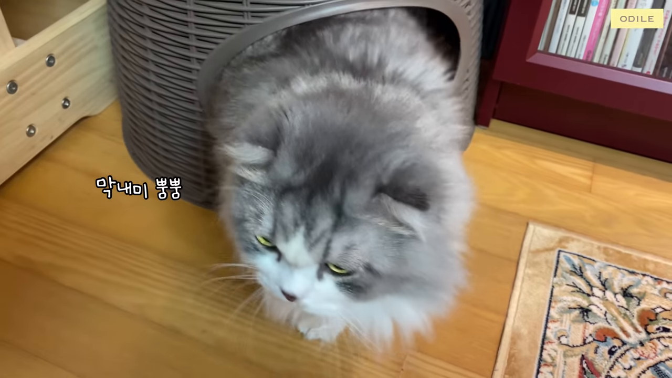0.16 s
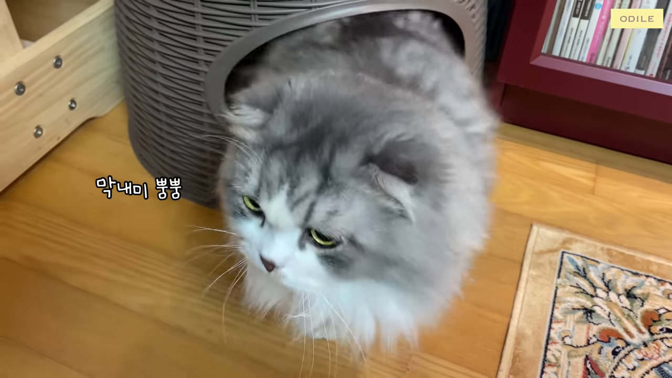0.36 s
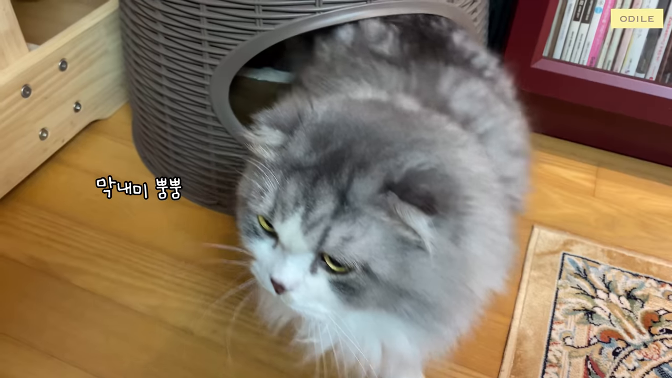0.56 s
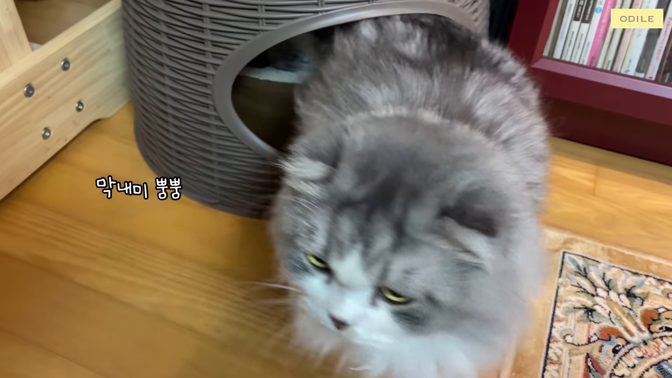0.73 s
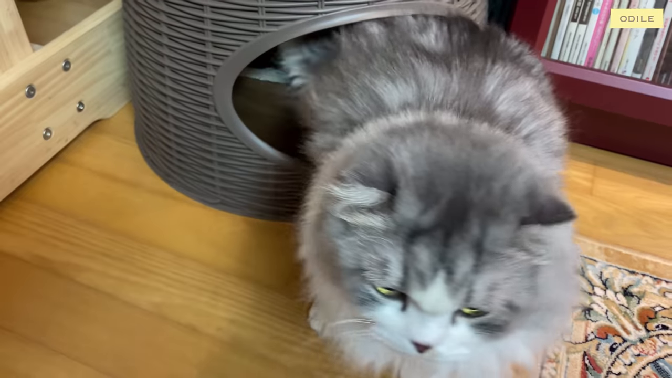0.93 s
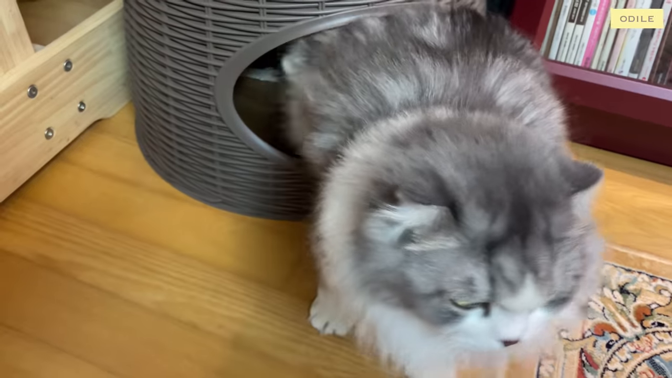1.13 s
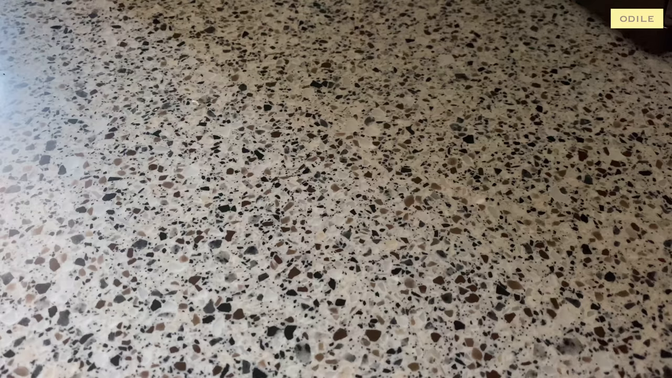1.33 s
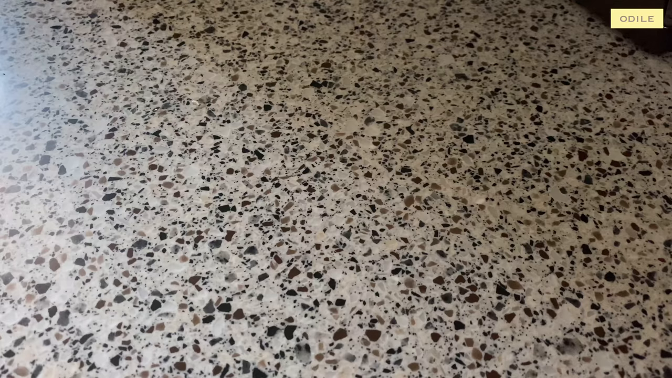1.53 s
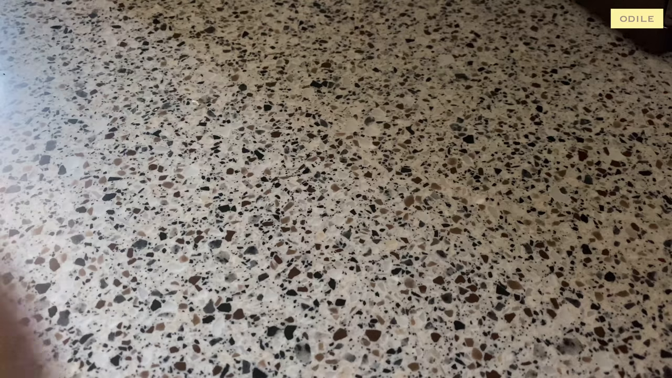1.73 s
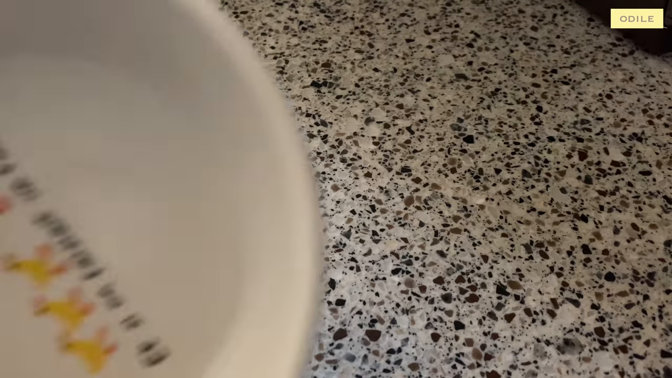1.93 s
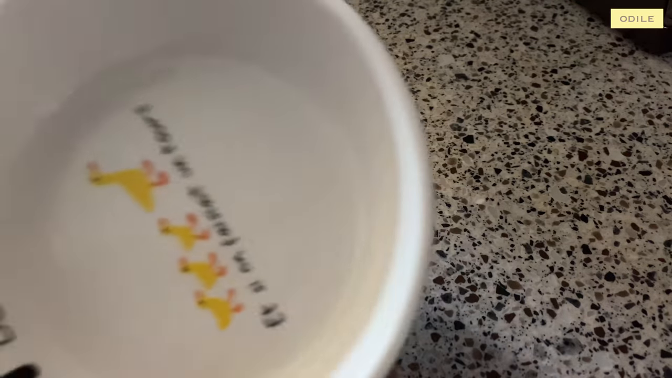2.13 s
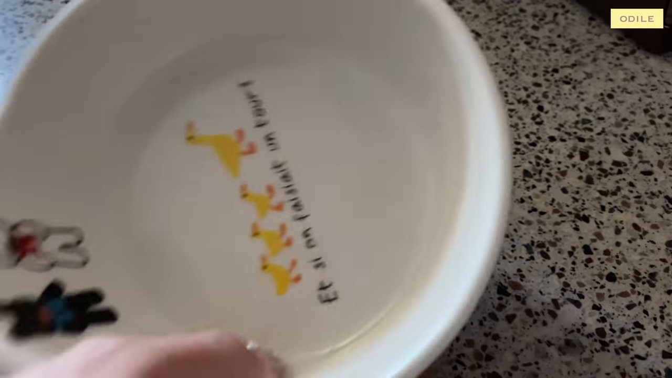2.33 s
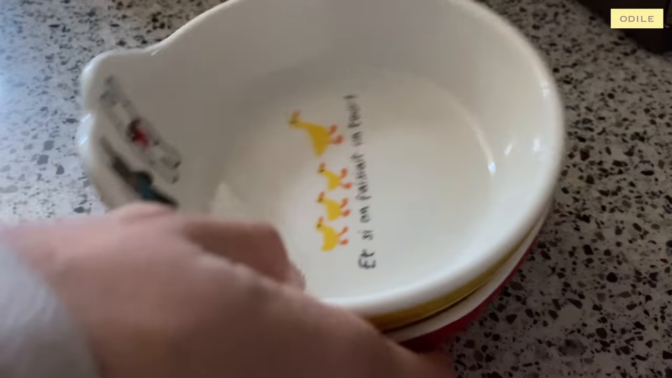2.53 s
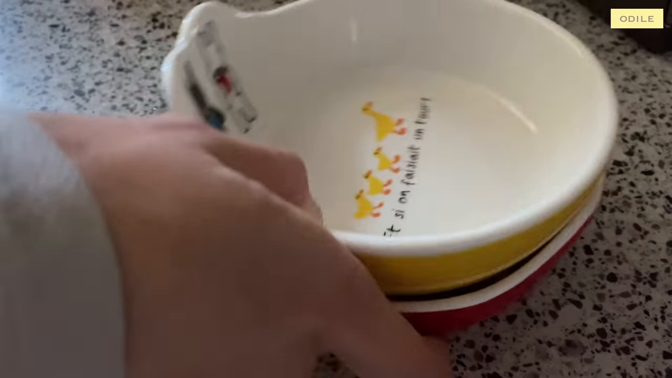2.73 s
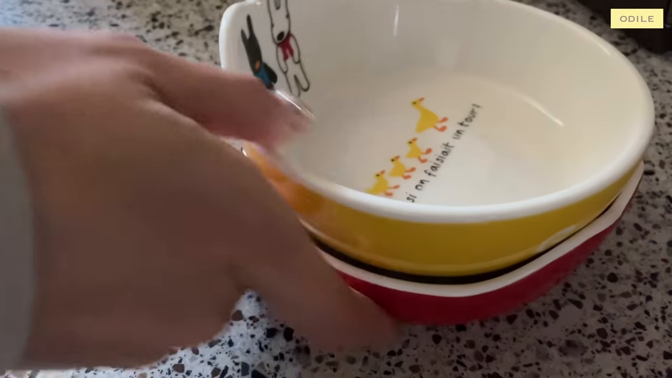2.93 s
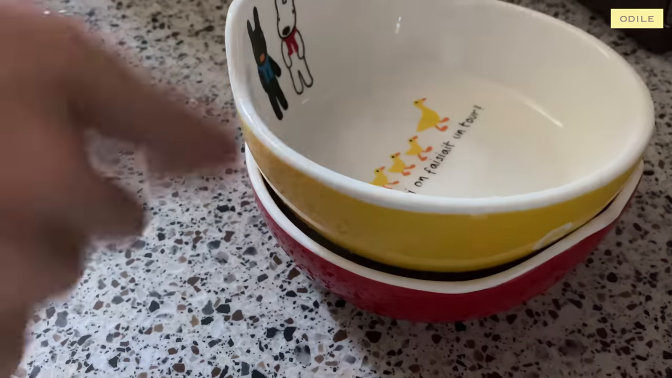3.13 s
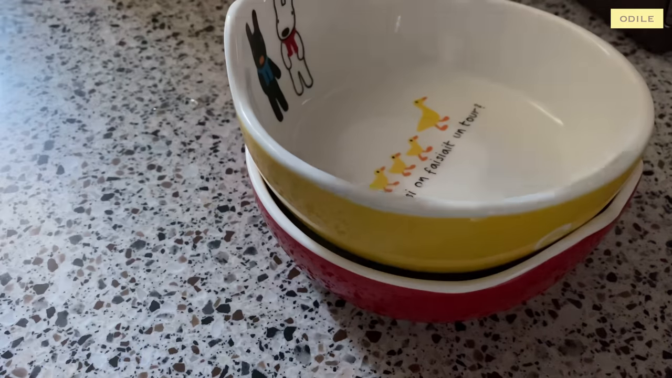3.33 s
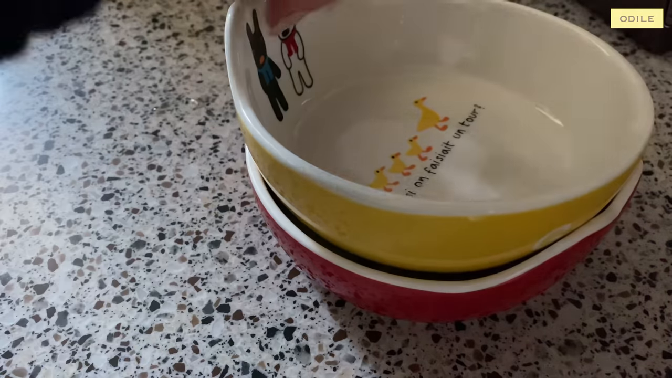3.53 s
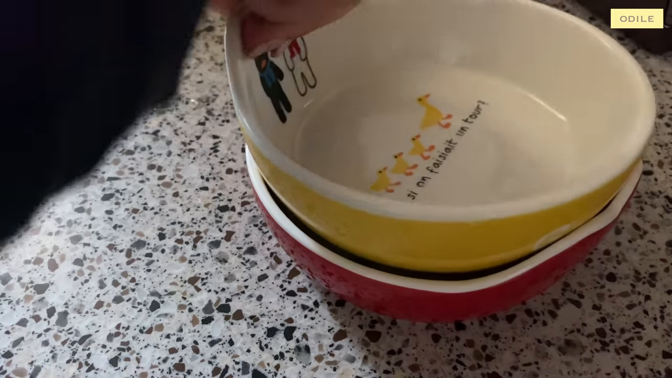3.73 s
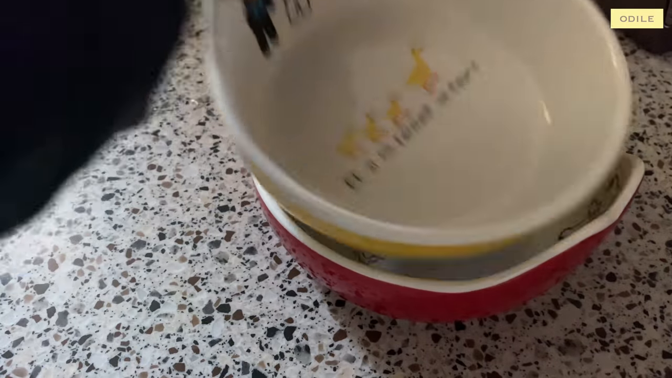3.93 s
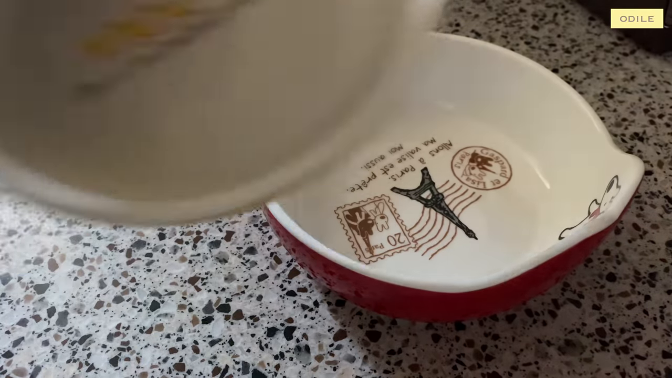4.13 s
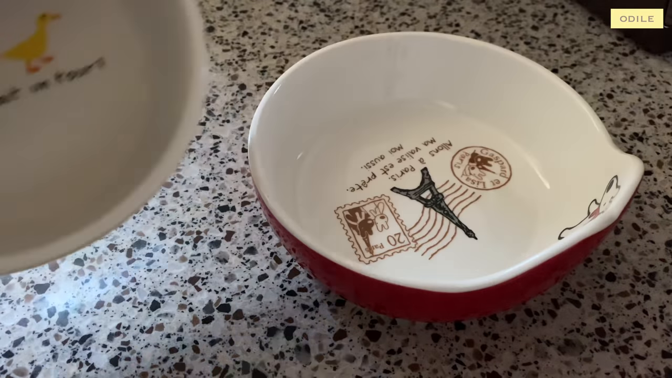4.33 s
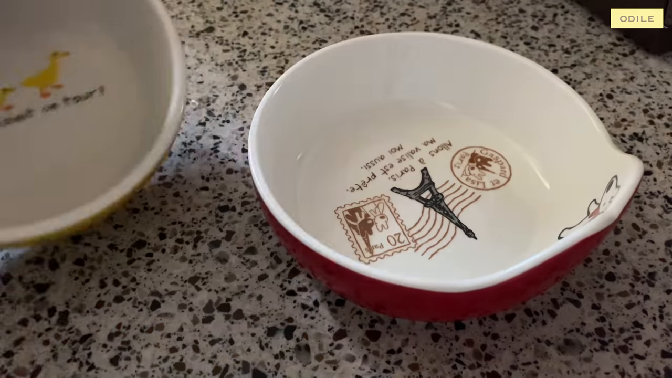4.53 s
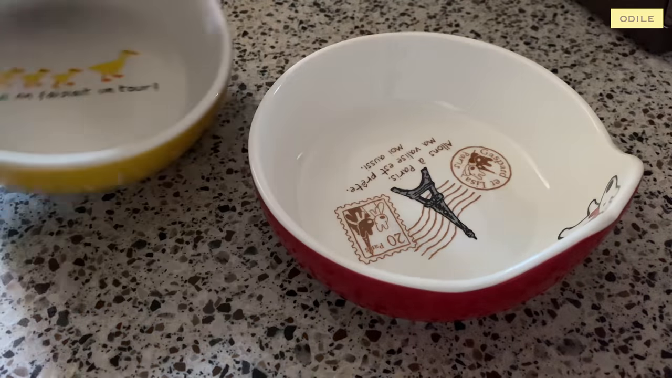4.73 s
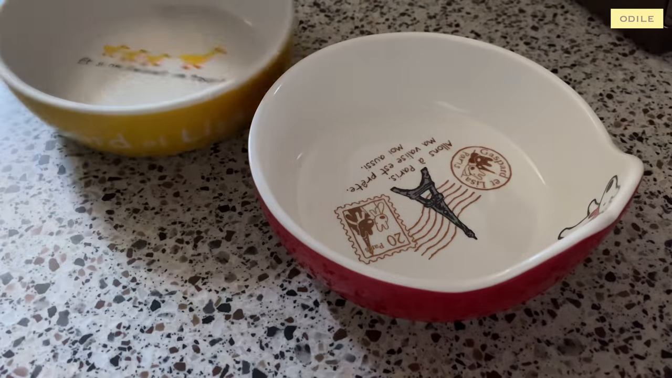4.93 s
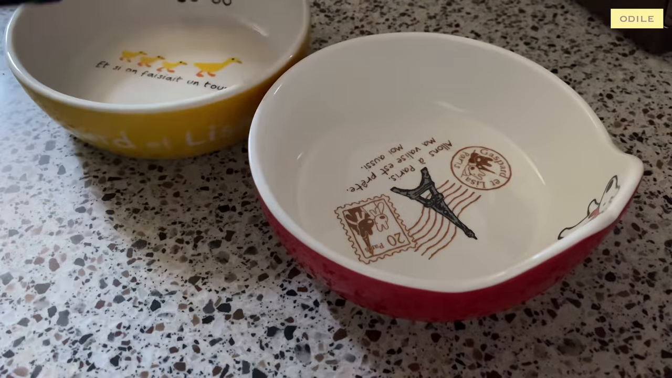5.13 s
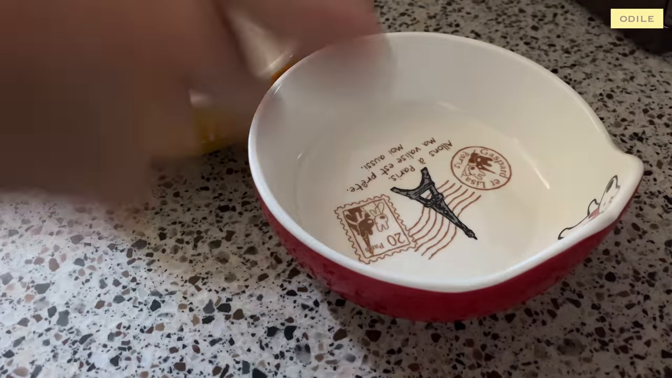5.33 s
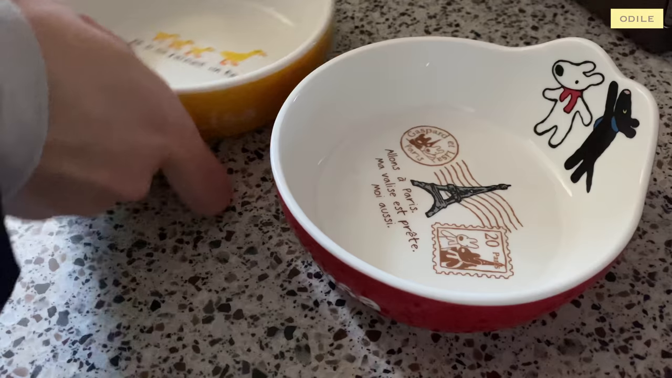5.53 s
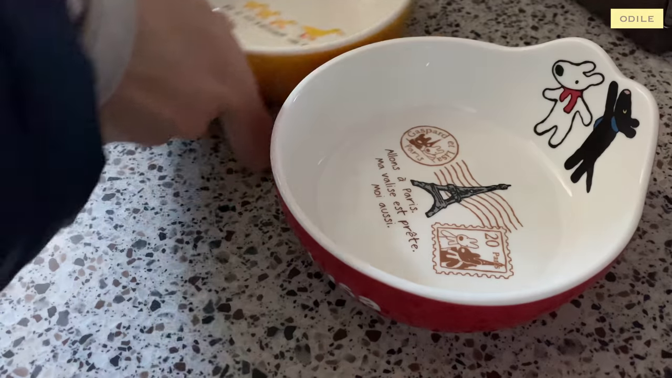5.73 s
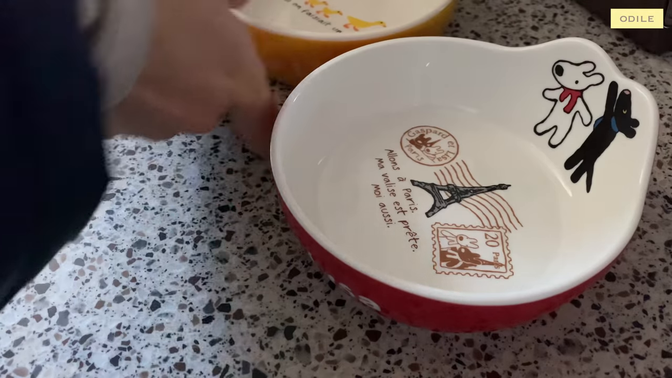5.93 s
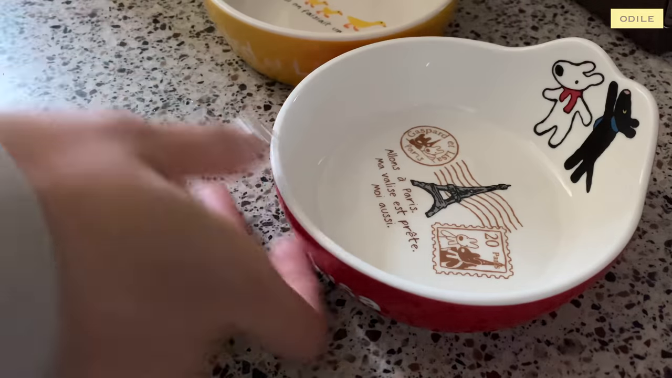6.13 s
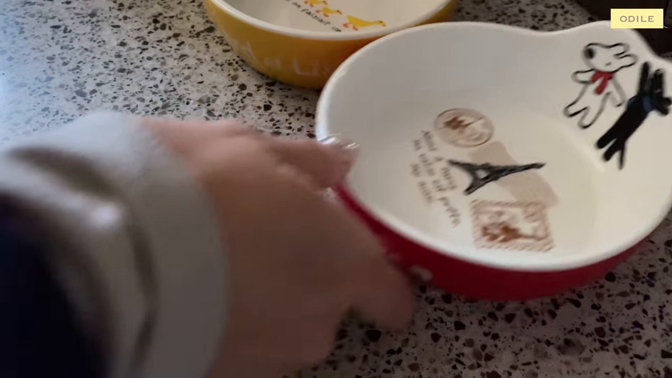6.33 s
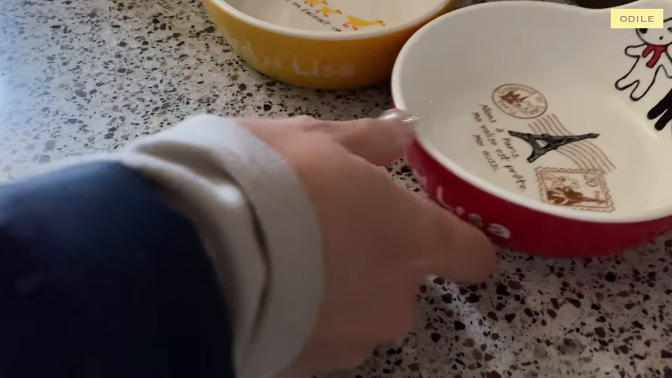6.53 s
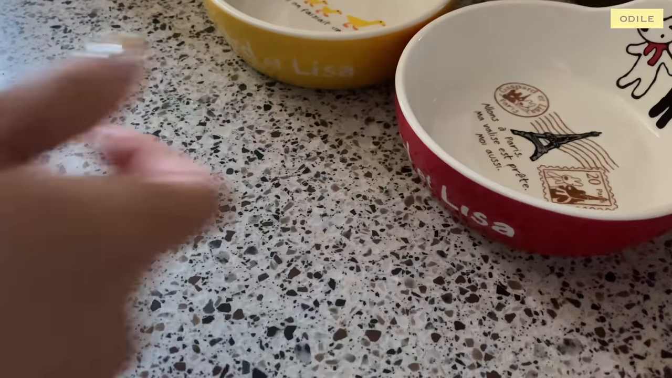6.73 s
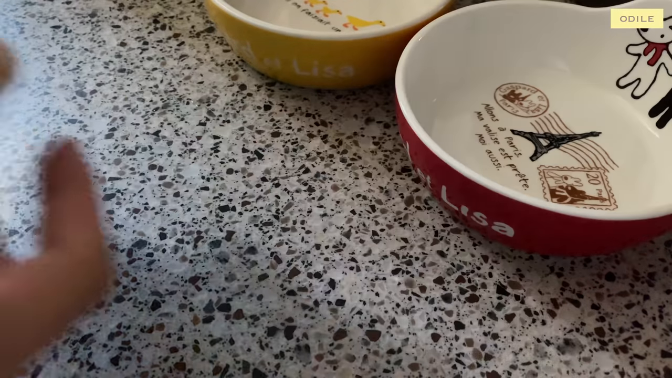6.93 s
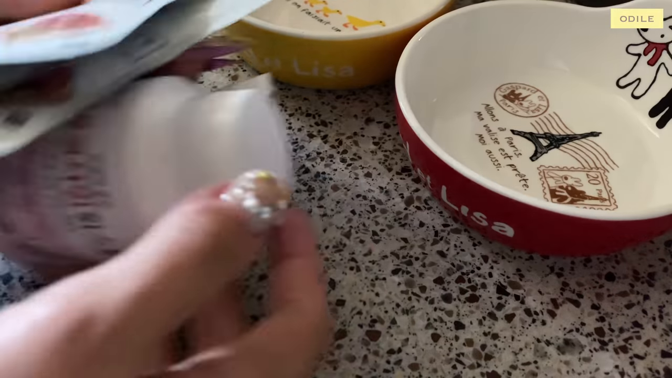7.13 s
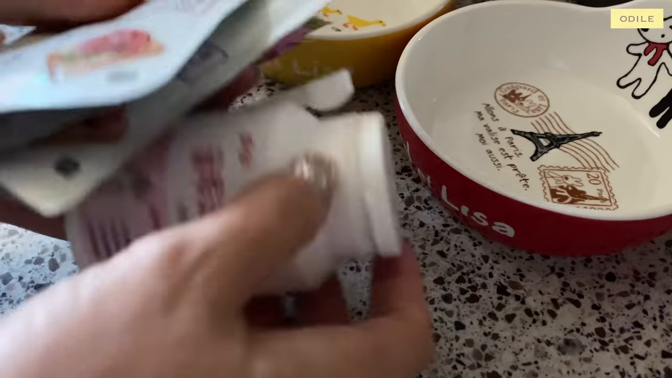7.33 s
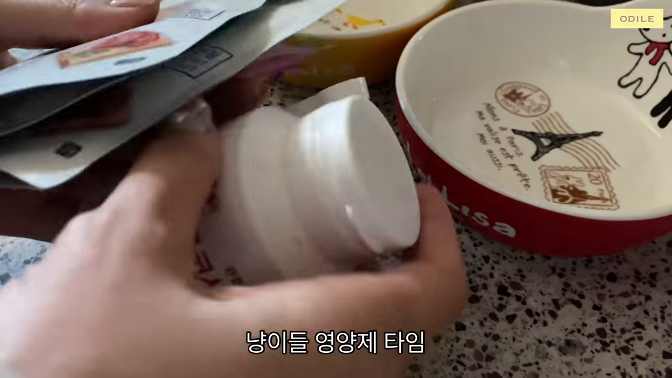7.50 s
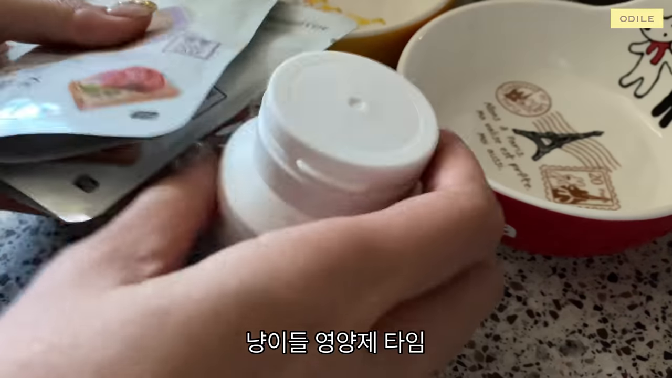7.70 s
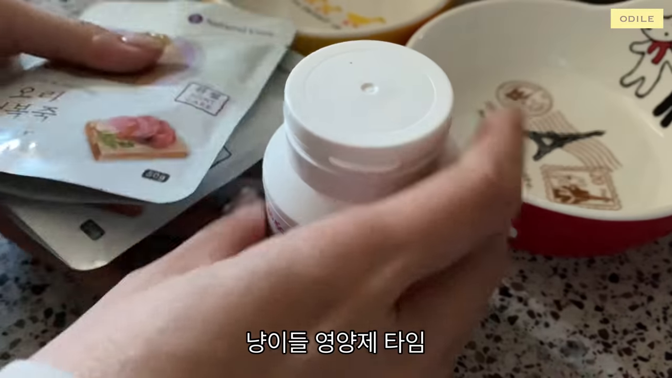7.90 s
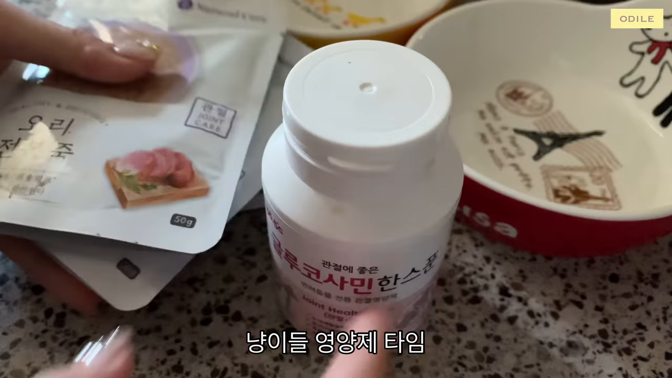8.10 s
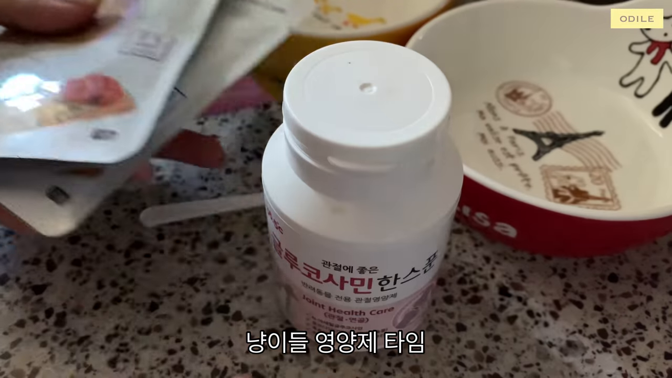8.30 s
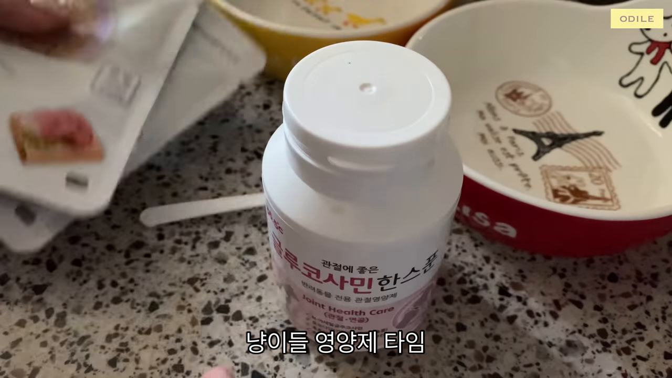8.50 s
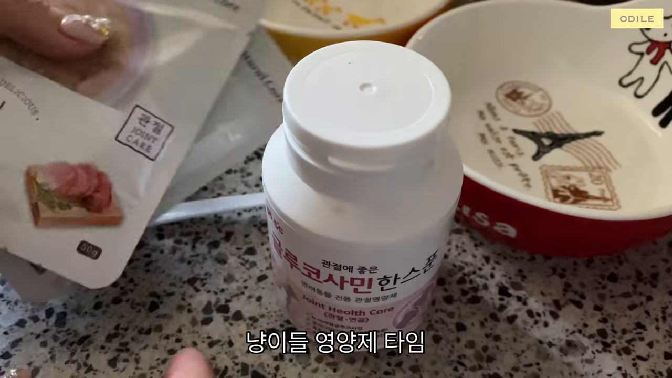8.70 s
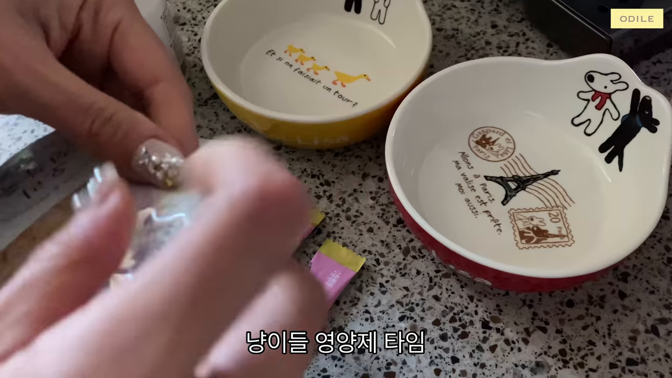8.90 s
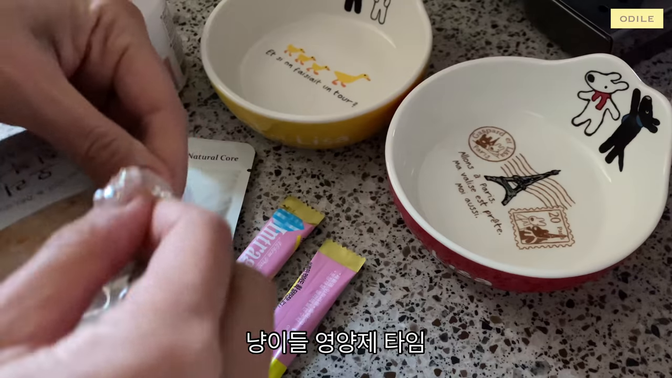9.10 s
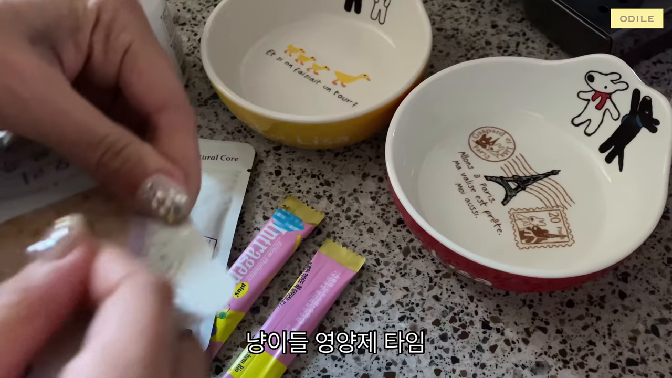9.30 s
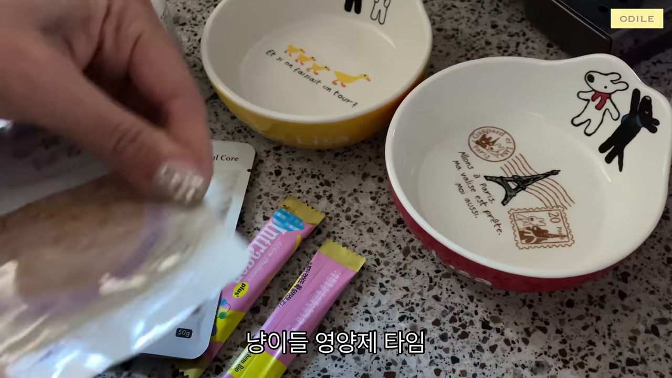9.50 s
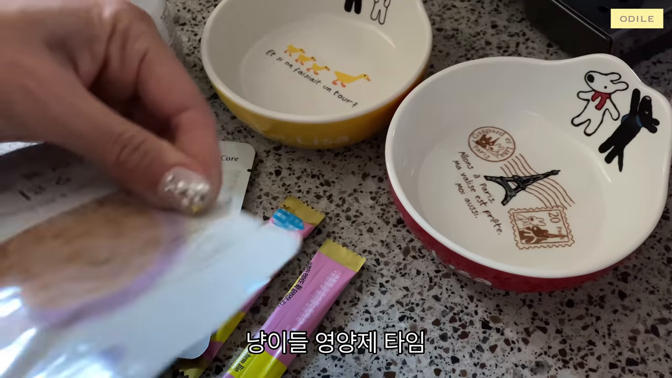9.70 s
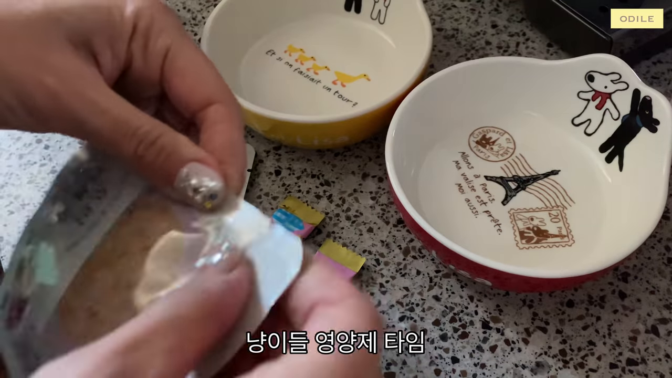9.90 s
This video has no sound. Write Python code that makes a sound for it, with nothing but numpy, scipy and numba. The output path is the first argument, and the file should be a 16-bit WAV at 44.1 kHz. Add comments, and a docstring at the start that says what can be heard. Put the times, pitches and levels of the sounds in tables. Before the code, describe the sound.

Wicker basket rustles and creaks faintly, then ceramic bowls knock, scrape and clink on a stone counter, followed by crinkling foil pouches.

```python
"""Cat in a basket, bowls on a counter

A cat steps out of a creaking wicker basket (filtered noise and grains); then, in a kitchen, stacked ceramic bowls
are set down, parted and slid over a stone counter, a plastic jar is put beside them and foil pouches crinkle.
Blows and grit drive decaying modes of counter, feet and walls; foil is noise bursts; a small hard room answers."""
import sys
import numpy as np
from scipy import signal
from scipy.fft import rfft, irfft
from scipy.io import wavfile
from scipy.ndimage import uniform_filter1d
from numba import njit

SR = 44100
rng = np.random.default_rng(int(sys.argv[2]) if len(sys.argv) > 2 else 0)


def dump_mix(stems):
    """Bounce the given channels to the path in sys.argv[1] as a 16-bit WAV at rate SR."""
    frames = np.atleast_2d(stems).T  # one column per channel
    limited = np.clip(frames, -1, 1)  # hard clip at full scale
    pcm = np.round(limited * 32767).astype(np.int16)
    wavfile.write(sys.argv[1], SR, pcm)


def ratio(d):
    """dB to gain"""
    e = np.asarray(d, float) / 20
    return 10 ** e


N = 438794
T = np.arange(N) / SR


def noise(channels=1):
    """White noise."""
    return rng.standard_normal((channels, N)).squeeze()


def shaped(x, table):
    """Colours x by a (Hz, dB) spectrum, rms 1."""
    hz, db = np.transpose(table)
    f = np.fft.rfftfreq(N, 1 / SR) + 1
    gain = ratio(np.interp(np.log(f), np.log(hz), db))
    y = irfft(rfft(x) * gain, N)
    return y / np.std(y)


def band(x, lo_hz, hi_hz):
    """Band-pass, rms 1."""
    sos = signal.butter(2, [lo_hz, min(hi_hz, .45 * SR)], "band", fs=SR, output="sos")
    y = signal.sosfilt(sos, x)
    return y / np.std(y)


def tracks(tables, column):
    """One column of curve tables as a track."""
    rows = np.vstack(tables)
    return np.interp(T, rows[:, 0], rows[:, column])


def gains(tables, columns):
    """Gain tracks from dB columns of curve tables, silent outside them."""
    sounding = sum((T >= table[0][0]) * (T < table[-1][0]) for table in tables)
    return [uniform_filter1d(ratio(tracks(tables, column=c)) * sounding, size=100) for c in columns]


def grains(rate_hz, spread_db):
    """Random clicks, most of them small, a few large."""
    chance = rng.random((2, N))
    size = ratio(-spread_db * np.log(chance[1] + .003))
    return (chance[0] < rate_hz / SR) * size * np.sign(noise())


def flicker(rate_hz, depth_db):
    """A gain that wanders in dB: random steps, smoothed."""
    k = int(SR / rate_hz)
    steps = np.repeat(rng.standard_normal(N // k + 1), k)
    return ratio(depth_db * uniform_filter1d(steps, k)[:N])


def near(hz, centre_hz, slope_db):
    """Modes close to the centre of a contact are driven hardest (slope per octave)."""
    return ratio(-slope_db * np.abs(np.log2(hz / centre_hz)))


@njit
def ring(drive, turn, loss):
    """One mode: a turning, shrinking pointer pushed by the drive."""
    y, z = np.empty(len(drive)), 0j
    for i in range(len(drive)):
        z = z * turn * (1 - loss[i]) + drive[i]
        y[i] = z.imag
    return y


def struck(modes, s, size, seat_ms, damping, rub):
    """A blow chatters while the faces seat, so each mode swells for that long; damping holds until the next blow."""
    k = np.arange(700)
    seat_samples = np.clip(seat_ms, .1, 15)[:, None] * SR / 1000 + 2
    push = np.sin(np.pi * np.clip((k + 1) / seat_samples, 0, 1))
    push /= push.sum(axis=1, keepdims=True)
    at = (s * SR).astype(int)
    latest = np.clip(np.searchsorted(at, np.arange(N), "right") - 1, 0, None)
    held = np.clip(damping, .2, 8)[latest]
    out = 0
    for hz, db, t60 in zip(*modes):
        turn = np.exp(2j * np.pi * hz / SR)
        phase = np.exp(2j * np.pi * rng.random((len(s), 1)))
        drive = np.full(N, 1e-18j) + rub(hz)
        # the push turns with the mode, so it builds up in phase
        np.add.at(drive, at[:, None] + k, size(hz)[:, None] * phase * push * turn ** k)
        out = out + ratio(db) * ring(drive, turn, held * np.log(1000) / (t60 * SR))
    return out


BURST_ATTACK_S = 0.00038


def bursts(s, db, hz, t60_s, width):
    """Short decaying noise bursts, each from hz / width to hz * width."""
    out, t = np.zeros(N), np.arange(4000) / SR
    hiss = rng.standard_normal((len(s), len(t)))
    for at, g, f, d, n in zip((s * SR).astype(int), ratio(db), hz, t60_s, hiss):
        sos = signal.butter(2, [f / width, min(f * width, .4 * SR)], "band", fs=SR, output="sos")
        b = signal.sosfilt(sos, n)
        rise = 1 - np.exp(-t / BURST_ATTACK_S)
        decay = np.exp(-t * np.log(1000) / max(d, .004))
        out[at:at + len(t)] += (g * b / b.std() * rise * decay)[:N - at]
    return out


# Wicker cracking. Each row: start in seconds, burst level in dB, centre in Hz.
WICKER_CRACKS = [(0.2934, -60.5, 1470), (0.4652, -42, 1360), (0.5274, -50, 1270), (0.5827, -49, 1160),
                 (0.806, -42.5, 2550), (0.8693, -46.5, 1490), (1.202, -60.5, 1520)]
# Paws in the wicker. Each row: time in seconds, creak in dB, rustle in dB.
PAWS = [(0.0, -56, -61.5), (0.324, -58.5, -62.5), (0.582, -50, -61), (0.688, -65, -72), (0.76, -55, -51),
        (0.926, -57, -53.5), (1.144, -66, -104), (1.27, -60, -71), (1.3, -80, -84)]
# Rustle spectrum. Each row: frequency in Hz, relative level in dB.
WICKER_SPECTRUM = [(350, -29), (600, 9), (2210, -4.5), (2540, -7), (2760, -8.5), (5870, -15), (8740, -27),
                   (11300, -16), (16000, -28)]
CRACK_T60_S = 0.2


def basket():
    """Wicker creaks low, rustles and cracks under the paws."""
    creak, rustle = gains([PAWS], columns=[1, 2])
    s, db, hz = np.transpose(WICKER_CRACKS)
    swarm = shaped(grains(4000, 2.5) + 0.26 * noise(), WICKER_SPECTRUM)
    low = band(band(noise(), 276, 492), 130, 1300)
    return creak * low + rustle * swarm + bursts(s, db, hz, CRACK_T60_S + 0 * s, 2.02)


# Lounge tone spectrum. Each row: frequency in Hz, relative level in dB per Hz.
LOUNGE_SPECTRUM = [(18, -43), (30, 1), (64, 0), (227, -7), (437, -1), (649, -27), (1100, -17), (4910, -45),
                   (6380, -47), (8740, -66), (16000, -37.5)]
# Kitchen hum spectrum. Each row: frequency in Hz, relative level in dB per Hz.
KITCHEN_SPECTRUM = [(18, -25.5), (30, 3), (161, -4), (461, -15.5), (569, -17), (2120, -26.5), (4780, -35),
                    (10200, -41.5), (12000, -56.5), (14400, -33), (16000, -57.5)]
LOUNGE_DB, KITCHEN_DB = -54.5, -64
CUT_S = 1.302  # lounge before, kitchen after


def room_tone():
    """Steady noise of lounge, then kitchen; the bass is shared by the two ports, the treble is not."""
    def pair(table, share):
        mid, side = shaped(noise(), table), shaped(band(noise(), 300, 18000), table)
        return mid + share * side * np.array([[1], [-1]])
    lounge = ratio(LOUNGE_DB) * pair(LOUNGE_SPECTRUM, 0.72)
    kitchen = ratio(KITCHEN_DB) * pair(KITCHEN_SPECTRUM, .4)
    return np.where(T < CUT_S, lounge, kitchen)


# Bowls dragged and fingered, one list per slide.
# Each row: time in seconds, grinding in relative dB, grit in dB.
SLIDE_CURVES = [
    [(2.16, -61, -54.5), (2.278, -45, -65.5), (2.38, -52, -63), (2.47, -43, -50), (2.566, -45, -61.5),
     (2.666, -59, -58.5), (2.71, -67, -58), (2.748, -45, -52.5), (2.886, -50, -65), (2.97, -59, -72)],
    [(3.6, -66, -92.5), (3.722, -55, -80), (3.772, -43, -55.5), (3.82, -57, -62.5)],
    [(4.5, -50, -55), (4.6, -46.5, -55.5), (4.664, -55.5, -69), (4.76, -52, -62), (4.82, -38, -52.5),
     (4.89, -44, -61.5), (4.94, -23, -51.5), (4.988, -75, -50.5), (5.028, -37, -56.5), (5.12, -53.5, -56.5),
     (5.27, -72.5, -63.5)],
    [(5.53, -52, -49), (5.586, -48.5, -48.5), (5.788, -46.5, -54.5), (5.862, -47, -59), (5.95, -63.5, -70)],
    [(6.14, -65, -72), (6.202, -52, -58.5), (6.234, -40, -56.5), (6.32, -48, -42), (6.396, -39.5, -55),
     (6.466, -41.5, -56), (6.526, -49.5, -64.5), (6.62, -85, -84)],
]


def per_slide(values):
    """One value for each slide as a track."""
    ends_s = [slide[-1][0] for slide in SLIDE_CURVES[:-1]]
    return np.array(values)[np.searchsorted(ends_s, T)]


# Things landing. Each row: start in seconds, knock in dB, centre in Hz, hardness in dB,
# thud in the counter in dB.
LANDINGS = [(0.467, -28, 484, -35, -50), (0.81, -36.5, 835, -2, -37), (2.094, -8.5, 687, -15, -14.5),
            (2.116, -27.5, 780, -14, -25), (2.386, -26.5, 700, -39, -39), (2.424, -29.5, 704, -16, -35),
            (2.446, -28, 760, -27, -32), (2.501, -35.5, 690, -29, -44.5), (2.539, -41.5, 705, -21, -39.5),
            (2.593, -4, 710, -13.5, -19), (2.762, -36, 574, -24, -37), (2.79, -32, 476, -23, -37.5),
            (2.813, -38, 586, -28, -51.5), (3.551, -47.5, 596, -39.5, -52), (3.626, -33, 600, -16, -35),
            (3.725, -31, 610, -15, -36.5), (3.792, -34, 626, -7.5, -44.5), (3.831, -11.5, 710, -21, -28),
            (3.853, -24.5, 805, -26.5, -39.5), (4.433, -6.5, 990, -7.5, -13.5),
            (4.458, -18.5, 528, -12, -35), (4.8, -34.5, 560, -8.5, -39.5), (4.922, -8.5, 606, -0.5, -15),
            (4.948, -22, 550, -14, -34), (5.033, -34, 1590, 2.5, -39.5), (5.059, -33, 1320, -31, -48.5),
            (5.485, -43, 584, -15, -41.5), (5.533, -51, 900, -8, -68.5), (5.847, -38, 700, -13, -41.5),
            (6.17, -43, 717, -23.5, -57), (6.27, -8, 550, -11, -21.5), (6.3, -19.5, 616, -10, -32.5),
            (7.538, -18, 476, -18, -29), (7.652, -28, 560, -18.5, -35.5), (7.748, -35, 610, -6.5, -36.5),
            (9.197, -39.5, 615, 0.5, -53), (9.368, -31.5, 422, -10.5, -61),
            (9.585, -38.5, 940, -14.5, -64.5)]
# Bowl foot modes. Rows: frequencies in Hz, levels in dB, t60 in seconds at damping 1.
FOOT_MODES = ([480, 600, 655, 705, 800, 940, 1100, 1225, 1400, 1470, 1690, 1990, 2170, 2680, 3280], [-5,
              -.5, -3, .5, -5, -1.5, -3, -1.5, -.5, -1.5, -2.5, -3, -.5, -2, -4], [.06, .07, .07, .07, .06,
              .06, .06, .07, .06, .06, .05, .05, .06, .05, .04])
# Centre of the grinding in Hz, one per slide.
GRIND_CENTRES_HZ = [673, 640, 825, 850, 600]
SEAT_AT_0_DB_MS, SEAT_MS_PER_DB = 1.7, -.06  # a softer landing seats more slowly
KNOCK_DAMP_AT_0_DB, KNOCK_DAMP_PER_DB = 2.34, -0.03  # a softer landing dies sooner


def knocks():
    """Each landing rings the foot modes near its centre, a hard one the high ones too; dragging grinds them in fits."""
    s, db, hz, hard_db, _ = np.transpose(LANDINGS)
    centre_hz = per_slide(GRIND_CENTRES_HZ)
    grinding = gains(SLIDE_CURVES, columns=[1])[0]
    rub = grinding * band(grains(2500, 3.), 200, 3000) * flicker(50, 5.)

    def blow(f):
        return (near(f, hz, 16.4) + ratio(hard_db) * (f > 1150)) * ratio(db)

    def grind(f):
        return ratio(-37.5) * (near(f, centre_hz, 15.0) + ratio(-12.5) * (f > 1300)) * rub

    return struck(FOOT_MODES, s, blow, SEAT_AT_0_DB_MS + SEAT_MS_PER_DB * db,
                  KNOCK_DAMP_AT_0_DB + KNOCK_DAMP_PER_DB * db, grind)


# Counter modes. Rows: frequencies in Hz, levels in dB, t60 in seconds at damping 1.
COUNTER_MODES = ([52, 66, 88, 120, 155, 195, 245, 300, 345, 400], [-3, -.5, -.5, -3, -.5, -3, -.5, -1.5, -3,
                 -.5], [.25, .25, .2, .2, .2, .18, .18, .15, .12, .12])
# Deep bumps in the counter. Each row: start in seconds, level in dB, centre in Hz.
COUNTER_BUMPS = [(2.119, -24, 125), (3.642, -30, 142), (4.456, -24, 59), (4.951, -35, 52),
                 (5.949, -45.5, 59.7), (7.079, -29, 81.3), (7.70, -41, 70), (8.51, -40.5, 87.7),
                 (8.768, -49.5, 265)]
THUD_HZ, BUMP_DAMP = 281, 1.3
THUD_DAMP_AT_0_DB, THUD_DAMP_PER_DB = 4.15, 0.0863  # a louder thud dies sooner


def thuds():
    """The stone slab and the cupboards under it boom at each landing and bump."""
    s, db = np.transpose(LANDINGS)[[0, -1]]
    bump_s, bump_db, bump_hz = np.transpose(COUNTER_BUMPS)
    damping = np.maximum(THUD_DAMP_AT_0_DB + THUD_DAMP_PER_DB * db, 1)
    landed = struck(COUNTER_MODES, s, lambda f: near(f, THUD_HZ, 6.2) * ratio(db), 6. + 0 * s, damping,
                    lambda f: 0)
    bumped = struck(COUNTER_MODES, bump_s, lambda f: near(f, bump_hz, 11.0) * ratio(bump_db), 5.0 + 0 * bump_s,
                    BUMP_DAMP + 0 * bump_s, lambda f: 0)
    return landed + bumped


# Soft treble swishes, perhaps sleeves. Each row: middle in seconds, length in seconds, level in dB.
SLEEVES = [(1.382, .08, -72.5), (1.77, .1, -71), (2.64, 0.11, -57.5), (3.152, 0.49, -64.5),
           (3.9, 0.66, -69.5), (4.7, 0.2, -65), (5.222, .15, -57), (5.707, 0.4, -60), (6.048, .15, -64.5),
           (6.5, 0.35, -72)]


def swishes():
    """Flickering treble noise under bell-shaped swells, independent at the two ports."""
    swell = sum(ratio(db) * np.exp(-(2 * (T - s) / length_s) ** 2) for s, length_s, db in SLEEVES)
    return swell * band(noise(channels=2), 1700, 15500) * flicker(32, 1.7)


# Glaze on glaze or stone. Each row: start in seconds, crack in dB, upper bowl in dB,
# lower bowl rim in dB, lower bowl base in dB.
CONTACTS = [(2.0947, -55.5, -52, -61, -56), (2.35, -56, -75, -83, -75), (2.388, -51, -53.5, -65, -56),
            (2.5938, -24.5, -23, -42.5, -41), (2.7612, -55.5, -60, -72.5, -58),
            (3.5886, -42, -58, -72, -48), (3.638, -48.5, -57, -73, -68.5), (3.7248, -53, -59, -58.5, -60.5),
            (3.8298, -24, -55, -24.5, -40), (4.4296, -29, -30, -52, -26), (4.9218, -22, -29, -41, -23),
            (5.0334, -44.5, -71, -79, -56), (5.5344, -58, -61, -68, -62), (6.074, -60, -80, -68.5, -69.5),
            (6.2696, -27.5, -29, -23.5, -19.5), (6.2994, -33, -58, -56, -43), (6.3145, -40, -58, -48, -53)]
# Upper bowl modes. Rows: frequencies in Hz, levels in dB, t60 in seconds at damping 1.
UPPER_MODES = ([3045, 4010, 4786, 5518, 7311, 7946, 9798, 10600, 13400, 14400], [.5, -3, -3.5, -2.5, -2.5,
               -9, -3, -9, -12, -9], [.12, .08, .08, .13, .07, .08, .07, .1, .08, .08])
# Lower bowl rim modes. Rows: frequencies in Hz, levels in dB, t60 in seconds at damping 1.
RIM_MODES = ([1852, 1986, 4140, 4204, 4350, 6705, 6822, 7390, 8555, 9674, 10650, 12840, 13580, 14360], [-12,
             -1.5, .5, -1.5, -6, -1.5, -.5, -1.5, -18, -3, -8, -16, -14, -12], [.85, .2, .16, .15, .14, .22,
             .15, .08, .18, .17, .15, .18, .14, .15])
# Lower bowl base modes. Rows: frequencies in Hz, levels in dB, t60 in seconds at damping 1.
BASE_MODES = ([1500, 2290, 2385, 4651, 4883, 7865, 9911, 11300, 13370, 13840, 14550], [-4, -3, -.5, -10,
              -2.5, -4, -9, -11, -13, -9, -3], [.1, .1, .2, .2, .17, .13, .15, .15, .17, .16, .1])
# Grit spectrum. Each row: frequency in Hz, relative level in dB.
GRIT_SPECTRUM = [(88, -40), (150, -9), (1050, -3.5), (1490, -5), (2690, -11.5), (4940, -22), (8070, -33),
                 (8550, -37.5), (14300, -24), (16400, -40.5)]
# Singing of the walls against the grit in dB, one per slide.
SINGING_DB = [1., 1., 1., 2., 1.]
GRIP = 1.5  # damping factor of fingers on a bowl wall


def clinks():
    """Hard contacts ring the bowl walls under a short crack; grit under the foot ring keeps them singing."""
    s, crack_db, upper_db, rim_db, base_db = np.transpose(CONTACTS)
    seat_ms, grip = 0.5 + 0 * s, GRIP + 0 * s
    hiss = gains(SLIDE_CURVES, columns=[2])[0]
    rub = ratio(per_slide(SINGING_DB)) * hiss * band(grains(4200, 2.1), 1200, 14000) * flicker(25, 3.8)
    on_upper = T < 5.3  # the upper bowl is moved first, then the lower one
    rim_free = T > 6.02  # fingers mute the rim while the bowl is turned
    together = (s < 4.2) | (s > 5.3)  # in between the upper bowl lands alone, a duller contact on stone
    crack = bursts(s, crack_db, np.where(together, 3400., 3000.), .05 + 0 * s, 1.5)
    grit = hiss * shaped(grains(9000, 2.0), GRIT_SPECTRUM)

    upper_rub = rub * np.where(on_upper, 1, .4 * ~rim_free)
    upper = struck(UPPER_MODES, s, lambda f: ratio(upper_db - 55 * np.log2(max(f / 5600, 1)) * ~together),
                   seat_ms, grip, lambda f: ratio(-36) * near(f, 4000, 5.) * upper_rub)
    rim = struck(RIM_MODES, s, lambda f: ratio(rim_db) * together, seat_ms, grip * np.where(s > 5.3, 1.6, 1),
                 lambda f: ratio(-25) * near(f, 3000, 5.) * rub * rim_free)
    pressed = grip * np.where(abs(s - 5.8) < .4, 2.5, 1)  # the turning hand bears down on the base
    base = struck(BASE_MODES, s, lambda f: ratio(base_db) * together, seat_ms, pressed,
                  lambda f: ratio(-26) * near(f, 1800, 4.2) * rub * ~on_upper)
    return crack + grit + upper + rim + base


# Counter rumble against the grinding in dB, one per slide.
RUMBLE_REL_DB = [-1.5, 0, -8.5, -12.5, -22]
RUMBLE_SMOOTH_S = 0.068


def rumble():
    """The counter rumbles under dragged bowls: low noise on the smoothed grinding level."""
    grinding = gains(SLIDE_CURVES, columns=[1])[0]
    level = ratio(per_slide(RUMBLE_REL_DB)) * uniform_filter1d(grinding, int(RUMBLE_SMOOTH_S * SR))
    return level * band(noise(), 27, 170) * flicker(12, 4.4)


# Foil snapping. Each row: start in seconds, burst level in dB, centre in Hz.
FOIL_SNAPS = [(6.923, -47.5, 10340), (7.223, -57, 3350), (7.3789, -25.5, 3160), (7.4881, -31.5, 4274),
              (7.5407, -45, 2270), (7.7664, -20, 9330), (7.8114, -43.5, 2940), (7.862, -29.5, 7700),
              (7.9164, -40.5, 2160), (7.9423, -42, 2520), (8.0051, -40, 2240), (8.0377, -36, 4600),
              (8.3765, -48, 4560), (8.515, -32, 4250), (8.766, -37, 2260), (8.7984, -37.5, 2870),
              (8.8583, -30.5, 3950), (8.9443, -46, 2860), (9.2, -32.5, 3985), (9.3695, -36, 2000),
              (9.5878, -44.5, 3500), (9.6235, -38, 2090), (9.6856, -45, 3200), (9.784, -47, 4240),
              (9.8261, -39, 4104)]
# Pouches handled. Each row: time in seconds, crinkle in dB, body in dB.
HANDLING = [(6.6, -65.5, -72.5), (6.88, -69, -74), (7.1, -58, -77), (7.45, -67.5, -79),
            (7.55, -53.5, -72.5), (7.62, -66.5, -70.5), (7.8, -53.5, -59), (7.92, -55, -60),
            (8.2, -74, -69.5), (8.4, -56.5, -76.5), (8.48, -75.5, -74), (8.53, -61.5, -70.5),
            (8.65, -66.5, -80), (8.9, -62, -75), (9.17, -65, -72.5), (9.2, -41.5, -49), (9.33, -57, -70),
            (9.57, -73, -83.5), (9.6, -64.5, -72.5), (9.7, -54.5, -64), (9.74, -63, -71),
            (9.86, -50.5, -62), (9.95, -78, -88)]
# Crinkle spectrum. Each row: frequency in Hz, relative level in dB.
FOIL_SPECTRUM = [(710, -11.5), (1200, -10), (3500, -5), (6000, -9.5), (8490, -13), (10300, -10),
                 (12000, -14), (14500, -7), (16400, -23)]
SNAP_T60_S = 0.019


def pouches():
    """Foil buckles in a few loud snaps over a swarm of small ones that comes in fits."""
    s, db, hz = np.transpose(FOIL_SNAPS)
    crinkle, body = gains([HANDLING], columns=[1, 2])
    # each small snap shivers through the sheet
    smear = rng.standard_normal(200) * np.exp(-np.arange(200) / 40.)
    pops = np.convolve(grains(250, 4.2), smear)[:N] + .7 * noise()
    swarm = shaped(pops, FOIL_SPECTRUM) * flicker(40, 4.)
    rub = band(grains(4000, 2.), 300, 1500) * flicker(30, 4.)
    return bursts(s, db, hz, SNAP_T60_S + 0 * s, 2.6) + crinkle * swarm + body * rub


def room(x, low_t60_s, high_t60_s, rise_s):
    """Diffuse tail of a small hard room, the treble dying first; the bass is nearly alike at both ports."""
    t = np.arange(SR // 2) / SR
    n = rng.standard_normal((2, len(t)))
    bass = signal.lfilter(*signal.butter(1, 250, fs=SR), n)
    n += .8 * (bass.mean(axis=0) * np.sqrt(2) - bass)
    low = signal.lfilter(*signal.butter(1, 1500, fs=SR), n)
    tail = low * 1000 ** (-t / low_t60_s) + (n - low) * 2.1 * 1000 ** (-t / high_t60_s)
    tail *= 1 - np.exp(-t / rise_s)
    tail /= np.sqrt((tail ** 2).sum(axis=1, keepdims=True))
    return signal.fftconvolve(x[None], tail, axes=1)[:, :N]


# Near sources across the ports. Each row: time in seconds, left minus right in dB.
PAN_CURVE = [(0.0, 3), (0.41, -2), (1.22, -7.5), (2.1, 7), (2.44, 2.5), (4.0, 2), (4.2, 7), (4.4, 7.5),
             (5.48, 0.5), (6.43, 0.5), (7.29, 5.5), (7.6, 2), (8.76, 4), (9.28, 5), (9.48, 10), (9.95, 3.5)]
# Phase between the ports. Each row: frequency in Hz, lead of the left in radians.
PORT_PHASE = [(60, .2), (180, .35), (350, .5), (700, .85), (1400, 1.3), (2800, 1.85), (5600, 1.5),
              (9500, 1.1), (14000, .9)]


def scene():
    """Near sources reach the two ports with a level and phase difference; room and air surround them."""
    close = basket() + knocks() + clinks() + pouches()
    boom = thuds()
    air = room_tone() + swishes() + rumble()
    hz, lead = np.transpose(PORT_PHASE)
    f = np.fft.rfftfreq(N, 1 / SR) + 1
    turn = np.exp(.5j * np.interp(np.log(f), np.log(hz), lead))
    ports = irfft(rfft(close) * np.array([turn, 1 / turn]), N)
    pan_db = tracks([PAN_CURVE], column=1)
    panned = ports * ratio(np.array([pan_db, -pan_db]) / 2)
    slab = boom * ratio(np.array([[-1.5], [1.5]]))  # the counter is heard a little to the right
    return panned + slab + ratio(-10) * room(close + boom, 0.3, 0.15, 0.006) + air


def band_limit(x):
    """A steep low-pass at the top of the band."""
    return signal.sosfilt(signal.butter(12, 16500, fs=SR, output="sos"), x)


# Narrow treble dips. Each row: centre in Hz, half width (at 1/e of the dB) in Hz, gain in dB.
TREBLE_DIPS = [(8650, 330, -20), (12100, 600, -28), (16500, 800, -18)]
GAIN, CEILING = 1.487, .97  # linear; CEILING is full scale of the rounding


def record(dry):
    """The microphone cuts the deep bass, the treble has narrow dips; loud peaks are rounded."""
    f = np.fft.rfftfreq(N, 1 / SR)
    dips_db = sum(db * np.exp(-((f - hz) / width_hz) ** 2) for hz, width_hz, db in TREBLE_DIPS)
    dipped = irfft(rfft(dry) * ratio(dips_db), N)
    heard = signal.sosfilt(signal.butter(4, 45, "high", fs=SR, output="sos"), dipped)
    mix = CEILING * np.tanh(GAIN * heard / CEILING)
    return band_limit(mix)


dry = scene()
out = record(dry)
dump_mix(out)
```